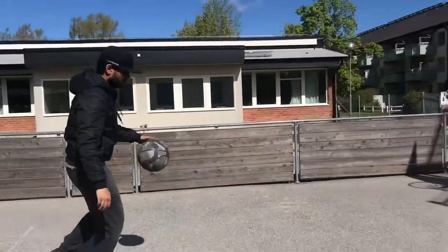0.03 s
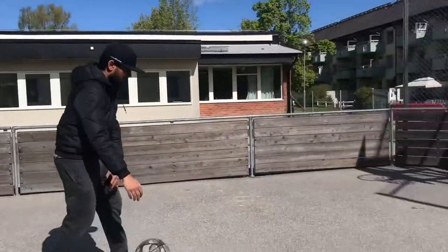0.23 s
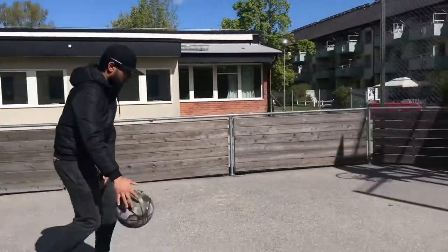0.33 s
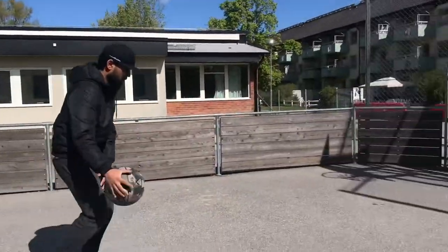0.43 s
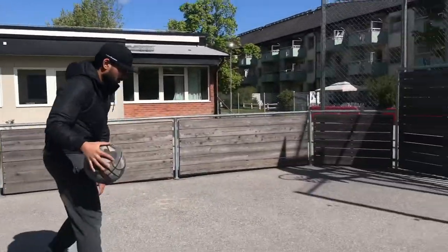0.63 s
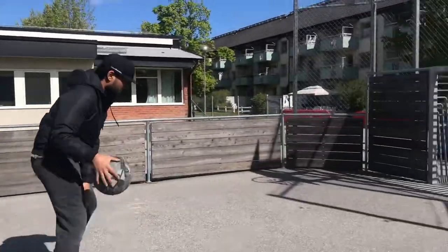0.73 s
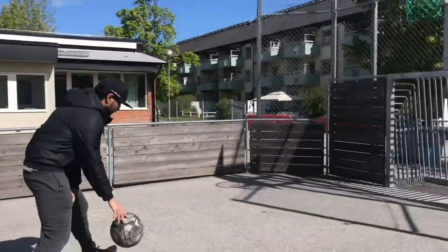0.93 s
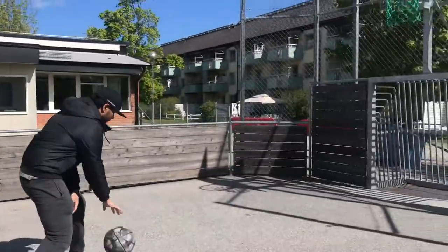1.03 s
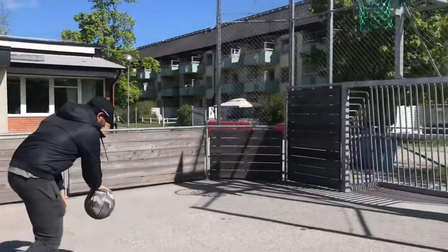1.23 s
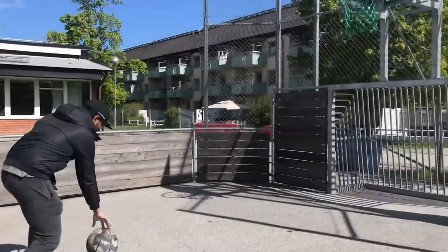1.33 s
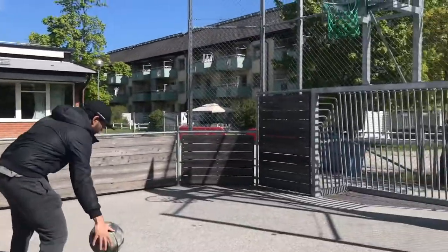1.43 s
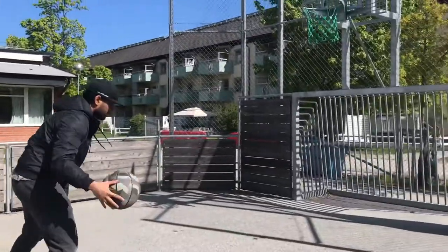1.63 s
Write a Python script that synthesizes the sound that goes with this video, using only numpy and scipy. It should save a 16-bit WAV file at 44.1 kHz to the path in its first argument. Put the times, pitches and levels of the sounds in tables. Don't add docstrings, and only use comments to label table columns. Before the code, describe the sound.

A ball is dribbled on asphalt: one loud cracking bounce, a pause, two softer slapping thumps and a faint last one, with gritty shoe scuffs between, in a boarded outdoor court, fairly close microphone.

```python
import sys
import numpy as np
from scipy import signal
from scipy.io import wavfile

SR = 44100
rng = np.random.default_rng(int(sys.argv[2]) if len(sys.argv) > 2 else 0)


def magnitude_from_level(level_db):
    exponent = np.asarray(level_db, float) / 20
    return 10 ** exponent


def unload_wav(signal):
    wavfile.write(
        sys.argv[1],
        SR,
        np.round(np.clip(np.atleast_2d(signal).T, -1, 1) * 32767).astype(np.int16),
    )


N = 74970
T = np.arange(N) / SR

# start_s, slap_db, thump_db, crack_db, crack_top_hz
BOUNCES = [
    (0.2396, -3.5, -13, -10, 3000),
    (1.0324, -12.5, -12.5, -27, 7850),
    (1.3722, -7, -14, -22, 9000),
    (1.6978, -27, -23.5, -30, 9000),
]


def at_hz(points, hz):
    table = np.array(points)
    return np.interp(np.log(hz), np.log(table[:, 0]), table[:, 1])


def band(x, low_hz, high_hz):
    return signal.sosfilt(signal.butter(2, [low_hz, high_hz], "band", fs=SR, output="sos"), x)


def coloured(spectrum, source, shape=lambda hz: 1):
    edges_hz = 22 * 2 ** np.arange(0, 9.7, .5)
    plain, shaped = 0, 0
    for k, (low_hz, high_hz) in enumerate(zip(edges_hz, edges_hz[1:])):
        centre_hz = np.sqrt(low_hz * high_hz)
        part = magnitude_from_level(at_hz(spectrum, centre_hz)) * band(source[k % 2], low_hz, high_hz)
        plain = plain + part
        shaped = shaped + part * shape(centre_hz)
    return shaped / np.std(plain)


def ring(clicks, hz, t60):
    radius, angle = magnitude_from_level(-60 / (t60 * SR)), 2 * np.pi * hz / SR
    poles = [1, -2 * radius * np.cos(angle), radius * radius]
    return signal.lfilter([0, np.sin(angle)], poles, clicks + 1e-18)


def swell(start, rise, t60):
    t = np.maximum(T - start, 0)
    attack = np.sin(np.pi / 2 * np.minimum(t / rise, 1)) ** 2
    return attack * magnitude_from_level(-60 * np.maximum(t - rise, 0) / t60)


def late(x, delay):
    return np.interp(T - delay, T, x, left=0)


def town_hum():
    # pitch_hz, level_db (per Hz)
    hum_spectrum = [(13, -39), (22, 14), (125, 1), (653, -10), (750, -8.5), (885, -6.5), (5610, -23.5),
                    (6440, -22.5), (16000, -27.5)]
    return magnitude_from_level(-54) * coloured(hum_spectrum, rng.standard_normal((2, N)))


def taps():
    # start_s, level_db, pitch_hz, length_cycles
    touches = [(.112, -46, 90, 4), (.405, -42, 390, 16), (.5745, -37, 1800, 3.5), (.5775, -40, 2000, 3.5),
               (.966, -38, 110, 3), (.9875, -42, 2500, 3.5), (.9955, -31, 720, 7), (1.0145, -39, 680, 9),
               (1.232, -32, 125, 5), (1.507, -34, 110, 4), (1.595, -36, 70, 6), (1.679, -25, 170, 5),
               (1.686, -30, 70, 4)]
    out = 0
    for s, db, hz, cycles in touches:
        out = out + magnitude_from_level(db) * swell(s, 0.35 / hz, cycles / hz) * np.sin(2 * np.pi * hz * (T - s))
    return out


def birds():
    # start_s, length_s, start_hz, end_hz, level_db
    peeps = [
        (.15, .065, 6350, 6330, -64),
        (.42, .08, 6320, 6300, -73),
        (.49, .09, 4250, 4250, -73),
        (1.45, .045, 11900, 12500, -68),
    ]
    throb_hz, throb_depth = 60, 0.67
    throb = 1 + throb_depth * np.sin(2 * np.pi * throb_hz * T)
    out = 0
    for s, length, start_hz, end_hz, db in peeps:
        part = np.clip((T - s) / length, 0, 1)
        envelope = np.sqrt(np.sin(np.pi * part) + 1e-12)
        turns = np.cumsum(start_hz + (end_hz - start_hz) * part) / SR
        out = out + magnitude_from_level(db) * throb * envelope * np.sin(2 * np.pi * turns)
    return out


def scuffs():
    # start_s, rise_s, fall_t60_s, level_db, low_share_db
    drags = [(0.22, 0.029, 0.18, -42, 9.5), (0.359, 0.0056, 0.12, -56, 3), (.394, 0.0059, 0.022, -50, 6),
             (0.5805, 0.0026, 0.064, -43, 2), (0.581, .018, 0.24, -40, 4), (.64, 0.15, 3.7, -66, 5),
             (0.677, 0.0013, 0.013, -61.5, -17.5), (.736, 0.00089, 0.035, -48, 1.5),
             (0.856, 0.0015, 0.019, -60, -8), (.930, 0.0024, 0.11, -48, 0), (.95, 0.01, 0.6, -61, 4),
             (1.072, 0.0023, 0.15, -46.5, -2), (1.083, 0.064, 0.69, -43, 1),
             (1.224, 0.0024, 0.07, -46, -31), (1.501, 0.031, 0.14, -44, 5), (1.616, .003, 0.073, -59.5, 8),
             (1.621, 0.15, 1.0, -51, 6.5)]
    # pitch_hz, level_db (per Hz)
    grit_spectrum = [(180, -40), (300, -2.5), (645, -6), (1230, 1), (2610, -4), (6000, -2), (10200, -4.5),
                     (15000, -4.5), (16000, -12)]
    grains_per_s, spread_db, flutter_db, low_below_hz = 9000, 5, 0.5, 5000
    rubbing = rng.standard_normal((2, N))
    struck = rng.random((2, N)) < grains_per_s / SR
    strength = magnitude_from_level(spread_db * np.minimum(rng.exponential(1, (2, N)), 3))
    grains = rubbing * (0.46 + struck * strength)
    flutter = band(rng.standard_normal(N), 17, 89)
    grains = grains * magnitude_from_level(flutter_db * flutter / flutter.std())
    high, low = 0, 0
    for s, rise, t60, db, low_db in drags:
        drag = swell(s, rise, t60)
        high = high + magnitude_from_level(db) * drag
        low = low + magnitude_from_level(db + low_db) * drag
    return coloured(grit_spectrum, grains, lambda hz: low if hz < low_below_hz else high)


def crack(s, crack_db, top_hz):
    width_s = .0005
    recoil = np.exp(-((T - s - width_s) / width_s) ** 2 * 8)
    contact = np.exp(-(2 * np.pi * top_hz * (T - s)) ** 2 / 2)
    snap = -np.diff(recoil - contact, prepend=0)
    return magnitude_from_level(crack_db) * snap / np.abs(snap).max()


def slap(k, s, slap_db):
    # pitch_hz, t60_s, first_db, second_db, third_db (last spot serves later bounces)
    ball_modes = [(735, 0.02, -12, -6.5, -18), (941, 0.03, -13.5, -8.5, -41.5),
                  (1213, 0.021, -15.5, -2.5, -6), (1520, 0.0067, 0.5, -5.5, -4),
                  (1754, 0.026, -45, -10.5, -14.5), (2034, 0.016, -8, -7.5, -15),
                  (2530, .012, -19.5, -19, -10.5), (3000, 0.0073, -33, -6, -7.5),
                  (3630, 0.005, -12, -7, -9.5), (4210, 0.0043, -16.5, -8.5, -6.5),
                  (5490, 0.0056, -15, -51, -14), (6300, 0.0078, -64, -39, -14.5),
                  (7800, .008, -43.5, -34, -55), (11900, 0.0035, -42, -37, -33)]
    contact_s, later_db, soft_hz = .003, -5, 3000
    low_hz, top_hz = 660, 9000
    share = np.r_[0, np.sort(rng.random(5))]
    places = ((s + contact_s * share) * SR).astype(int)
    out = np.zeros(N)
    for m, (hz, t60, *spot_db) in enumerate(ball_modes):
        clicks = np.zeros(N + SR)
        later = magnitude_from_level(later_db) * rng.standard_normal(5) / (1 + (hz / soft_hz) ** 2)
        clicks[places] = np.r_[(-1) ** m, later]
        out += magnitude_from_level(slap_db + spot_db[min(k, len(spot_db) - 1)]) * ring(clicks[:N], hz, t60)
    high_pass = signal.butter(4, low_hz, "high", fs=SR, output="sos")
    low_pass = signal.butter(2, top_hz, fs=SR, output="sos")
    return signal.sosfilt(np.vstack([high_pass, low_pass]), out)


def thump(k, s, thump_db):
    # start_hz, lag_s
    thump_starts = [(185, .0008), (260, .0048), (210, .0016), (200, .001)]
    end_hz, sag_s, rise_s = 74, .008, .0015
    hold_s, t60_s, octave_db = .0115, .028, -8.5
    start_hz, lag = thump_starts[k]
    t = np.maximum(T - s - lag, 0)
    turns = end_hz * t + (start_hz - end_hz) * sag_s * (1 - np.exp(-t / sag_s))
    envelope = magnitude_from_level(thump_db - 60 * np.maximum(t - hold_s, 0) / t60_s) * (1 - np.exp(-t / rise_s))
    return envelope * (np.sin(2 * np.pi * turns) + magnitude_from_level(octave_db) * np.sin(4 * np.pi * turns))


def wall_echoes(k, sharp, deep):
    echo_delays = [
        [.010, .0215, .0245, .0315, .0355, .0375, .049, .057],
        [.011, .0197, .0268, .032, .040, .053],
        [.0115, .0195, .0265, .040, .047, .061],
        [],
    ]
    echo_levels = [
        [-18, -15, -12, -16, -20, -18, -23, -25],
        [-18, -6, -6, -16, -17, -22],
        [-18, -7, -10, -18, -24, -25],
        [],
    ]
    deep_db, smear_s = -14.0, .0015
    walls, out = np.zeros(SR // 10), np.zeros(N)
    for delay, db in zip(echo_delays[k], echo_levels[k]):
        facets = np.r_[1, .35 * rng.choice([-1, 1], 4)]
        places = ((delay + smear_s * np.r_[0, rng.random(4)]) * SR).astype(int)
        walls[places] += magnitude_from_level(db - 2) * facets
        out += magnitude_from_level(db + deep_db) * late(deep, delay)
    return out + signal.fftconvolve(sharp, walls)[:N]


def ball():
    out = np.zeros(N)
    for k, (s, slap_db, thump_db, crack_db, top_hz) in enumerate(BOUNCES):
        sharp = slap(k, s, slap_db) + crack(s, crack_db, top_hz)
        deep = thump(k, s, thump_db)
        out += sharp + deep + wall_echoes(k, sharp, deep)
    return out


def court_tail():
    # pitch_hz, level_db (per Hz)
    tail_spectrum = [(50, -2.5), (100, 3), (230, 4), (520, -17.5), (1100, -5.5), (2200, -18.5), (4500, -26),
                     (9000, -84)]
    # pitch_hz, t60_s
    tail_decay = [(60, 2.57), (200, .9), (500, 0.3), (1100, 0.81), (2500, 0.86), (6000, 0.18)]
    lag_s, rise_s, early_db, early_share = .002, .018, 2, .14
    lump_db, lump_below_hz = 3.0, 450
    lumps = band(rng.standard_normal(N), 9.2, 35.8)
    lumps = magnitude_from_level(lump_db * lumps / lumps.std())

    def dying(hz):
        t60 = at_hz(tail_decay, hz)
        power = 0
        for s, _, thump_db, _, _ in BOUNCES:
            long_part = swell(s + lag_s, rise_s, t60)
            early_part = magnitude_from_level(early_db) * swell(s + lag_s, rise_s, t60 * early_share)
            power = power + (magnitude_from_level(thump_db + 5.5) * (long_part + early_part)) ** 2
        return (lumps if hz < lump_below_hz else 1) * np.sqrt(power)

    return magnitude_from_level(-26) * coloured(tail_spectrum, rng.standard_normal((2, N)), dying)


def scene():
    hum = town_hum()
    return (ball() + court_tail() + scuffs() + taps() + birds() + hum)[None]


def roll_off(x):
    return signal.sosfilt(signal.butter(12, 16670, fs=SR, output="sos"), x)


def record(dry):
    dip_hz, dip_width_hz, dip_share = 10500, 700, .6
    low_hz, top_hz = 35, 15800
    dip = band(dry, dip_hz - dip_width_hz / 2, dip_hz + dip_width_hz / 2)
    high_pass = signal.butter(2, low_hz, "high", fs=SR, output="sos")
    low_pass = signal.cheby1(10, 1, top_hz, fs=SR, output="sos")
    mix = signal.sosfilt(np.vstack([high_pass, low_pass]), dry - dip_share * dip)
    return roll_off(mix)


dry = scene()
out = record(dry)
unload_wav(out)
```